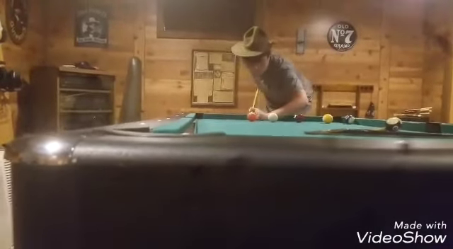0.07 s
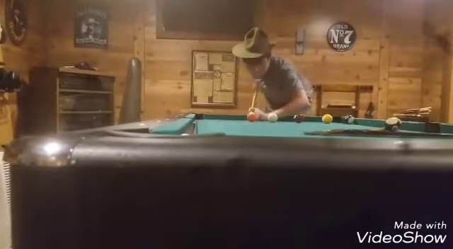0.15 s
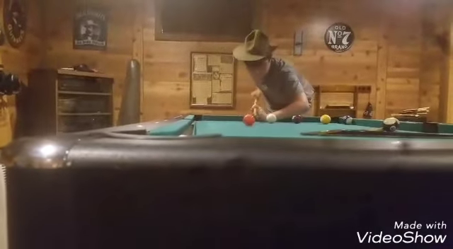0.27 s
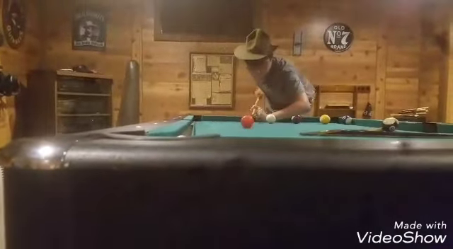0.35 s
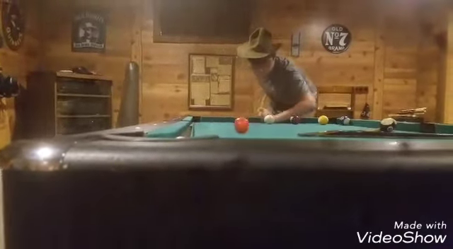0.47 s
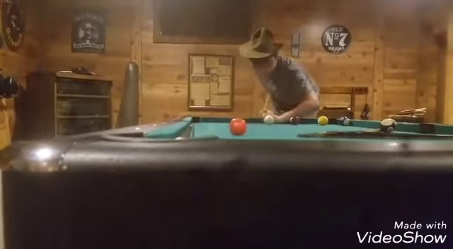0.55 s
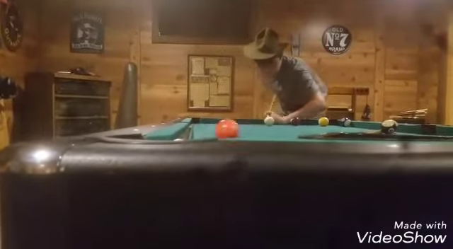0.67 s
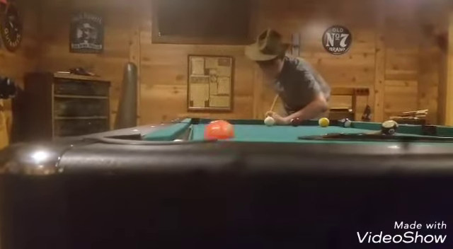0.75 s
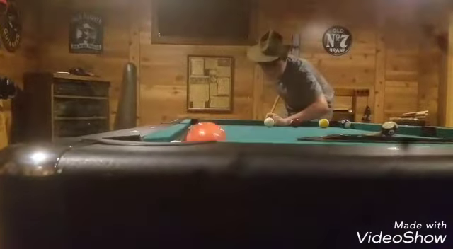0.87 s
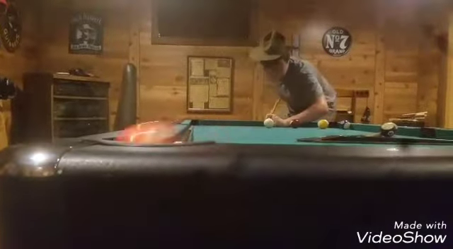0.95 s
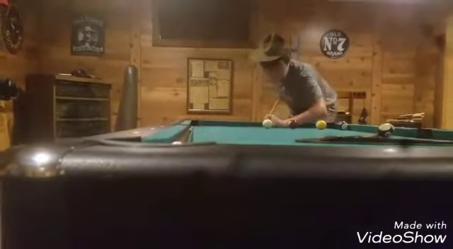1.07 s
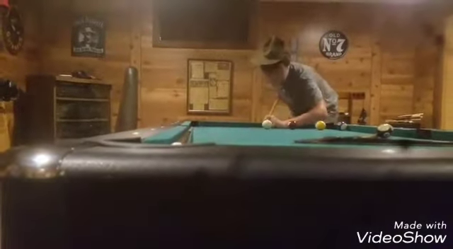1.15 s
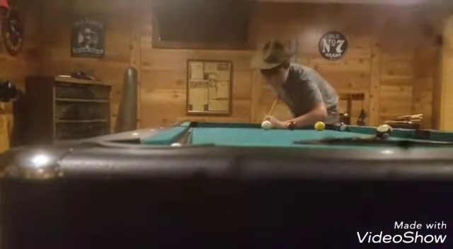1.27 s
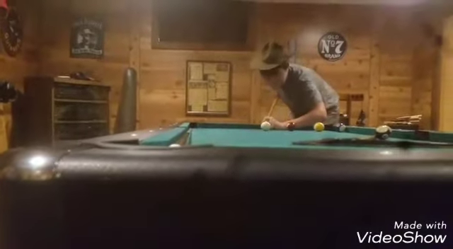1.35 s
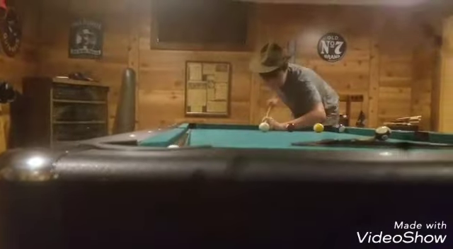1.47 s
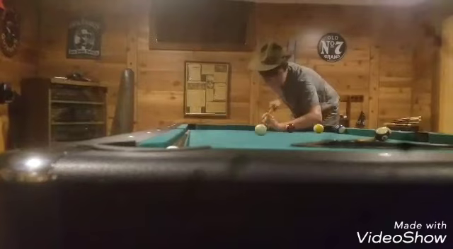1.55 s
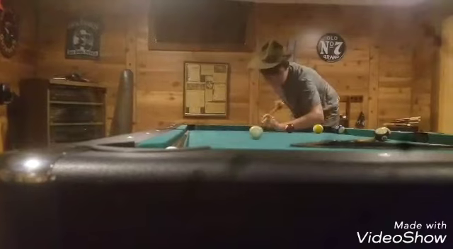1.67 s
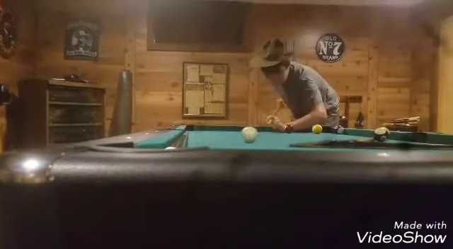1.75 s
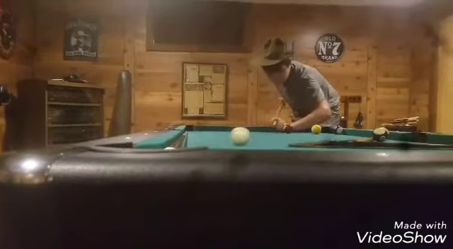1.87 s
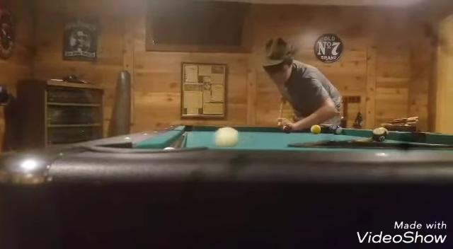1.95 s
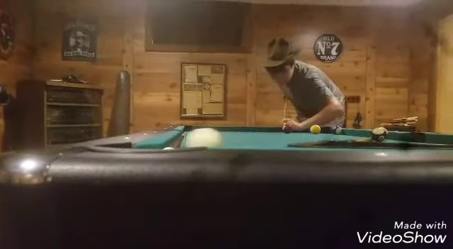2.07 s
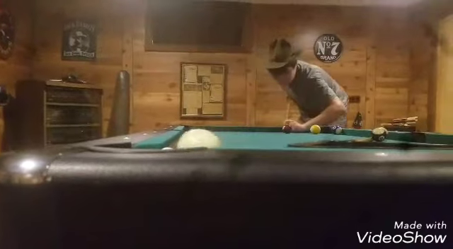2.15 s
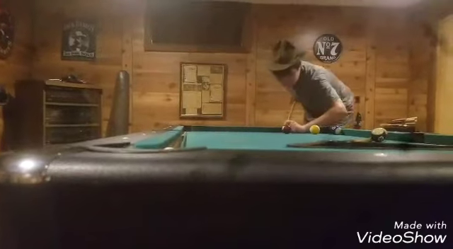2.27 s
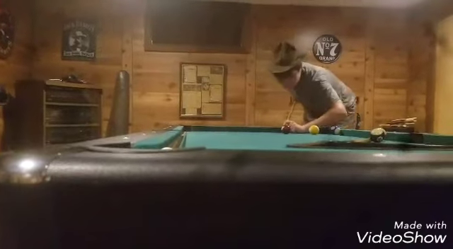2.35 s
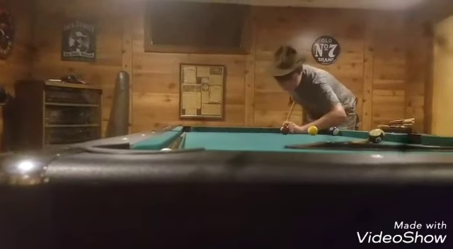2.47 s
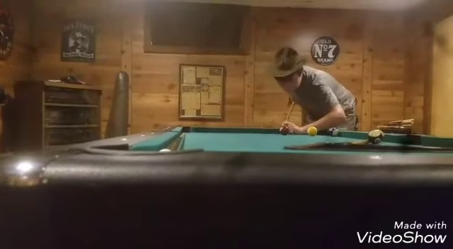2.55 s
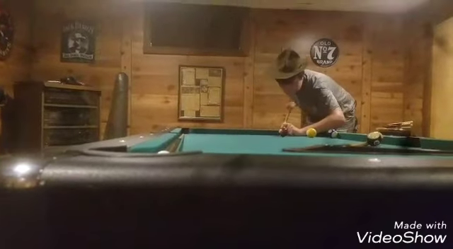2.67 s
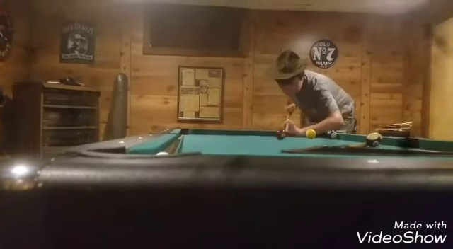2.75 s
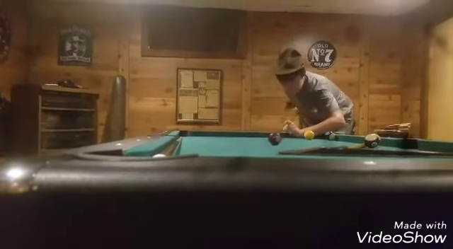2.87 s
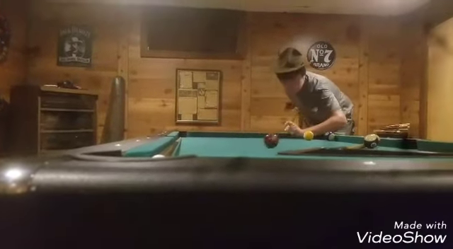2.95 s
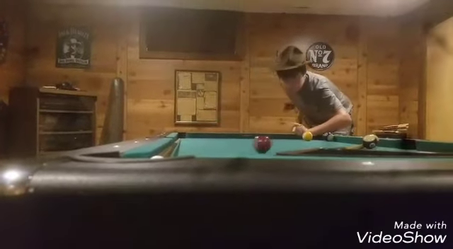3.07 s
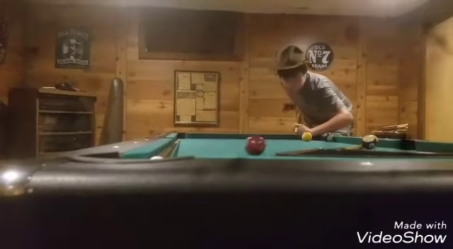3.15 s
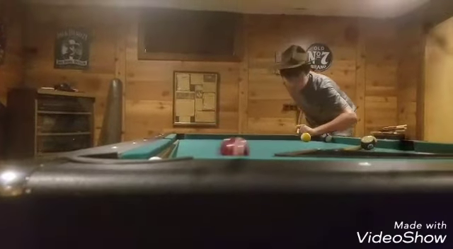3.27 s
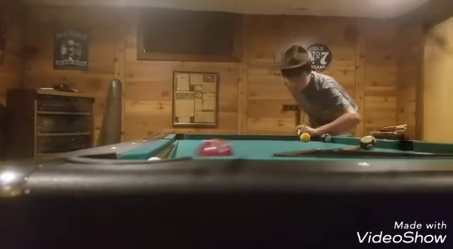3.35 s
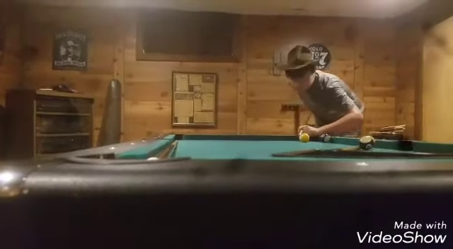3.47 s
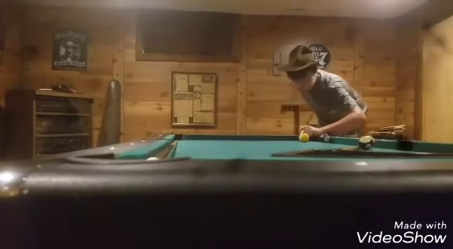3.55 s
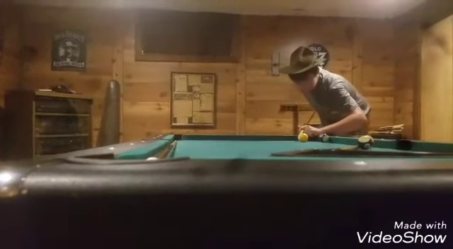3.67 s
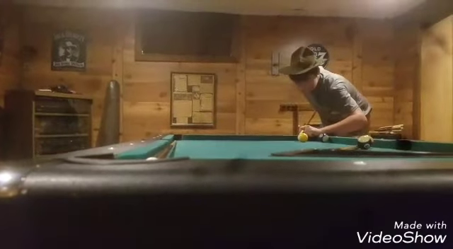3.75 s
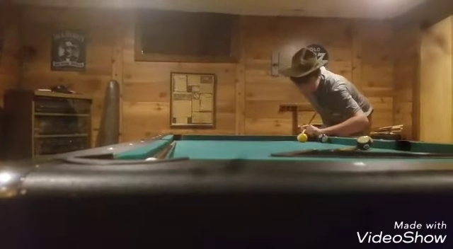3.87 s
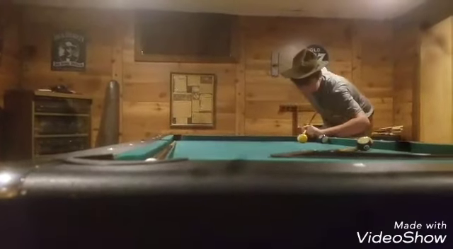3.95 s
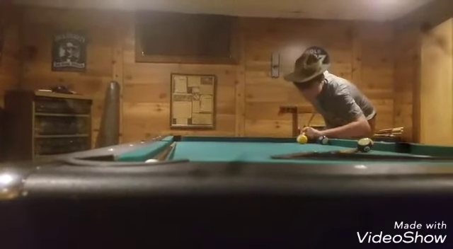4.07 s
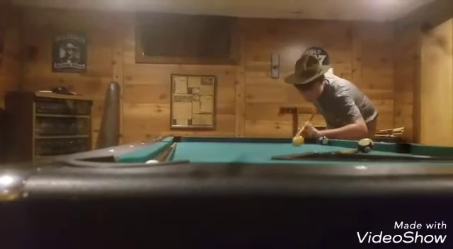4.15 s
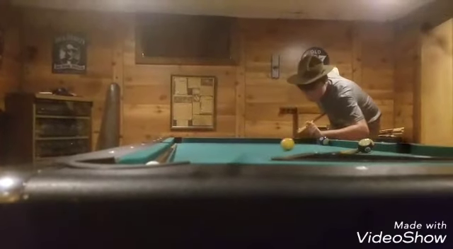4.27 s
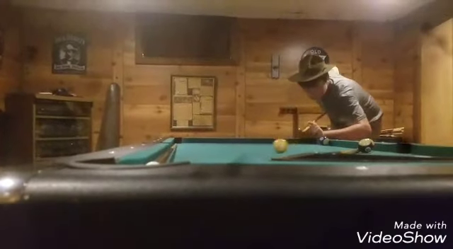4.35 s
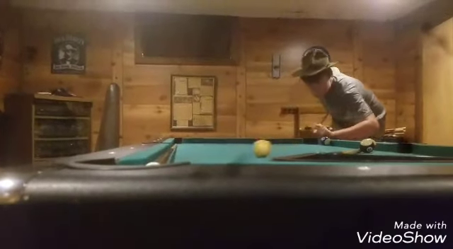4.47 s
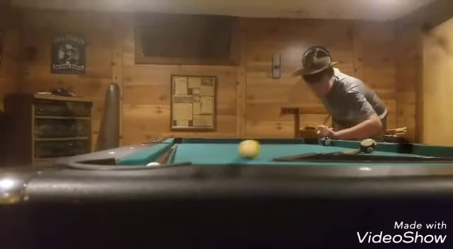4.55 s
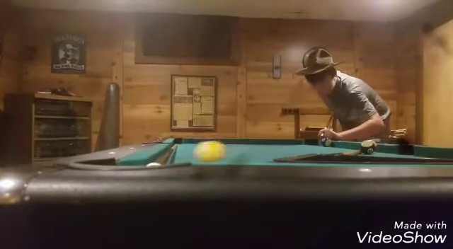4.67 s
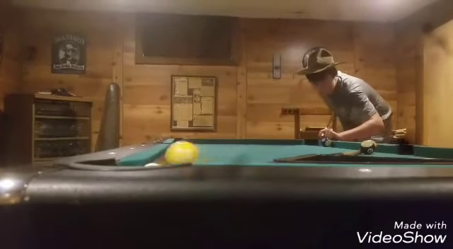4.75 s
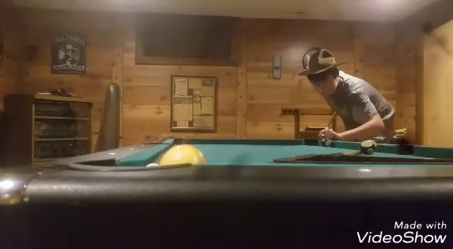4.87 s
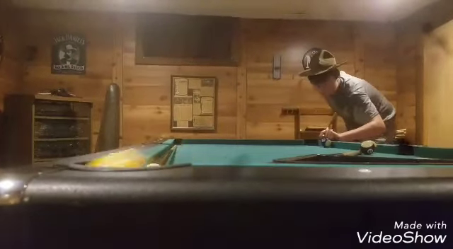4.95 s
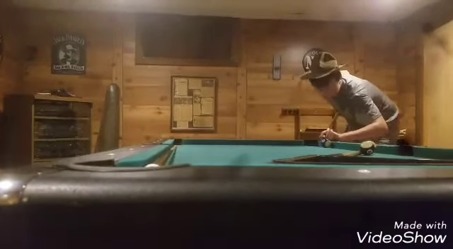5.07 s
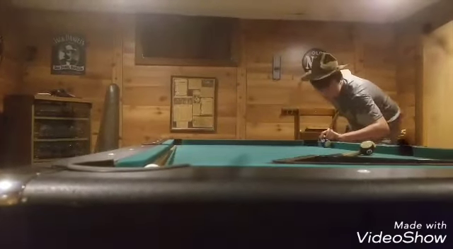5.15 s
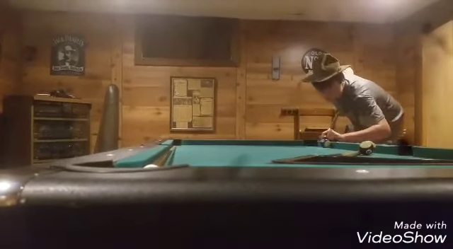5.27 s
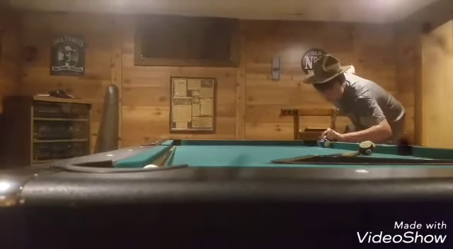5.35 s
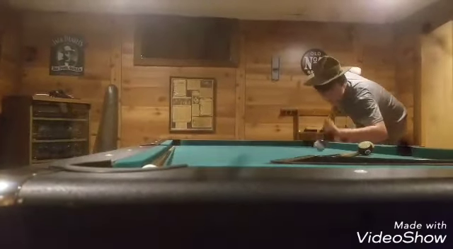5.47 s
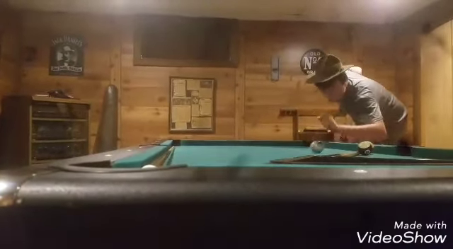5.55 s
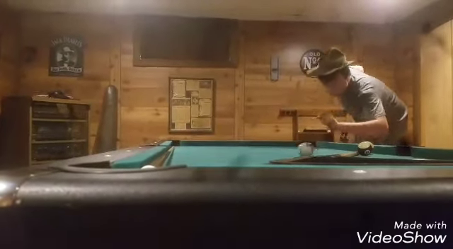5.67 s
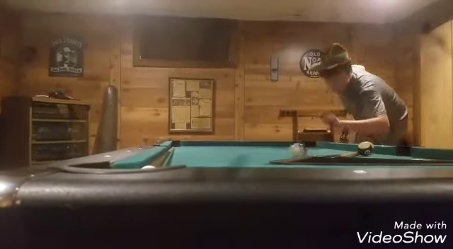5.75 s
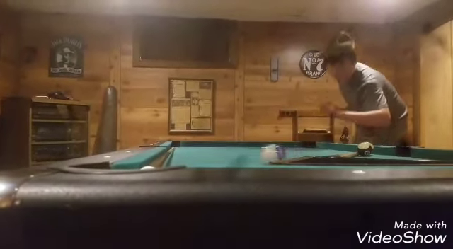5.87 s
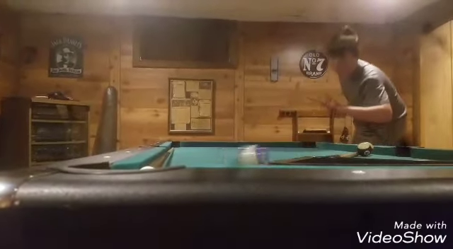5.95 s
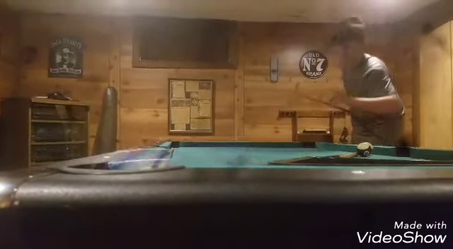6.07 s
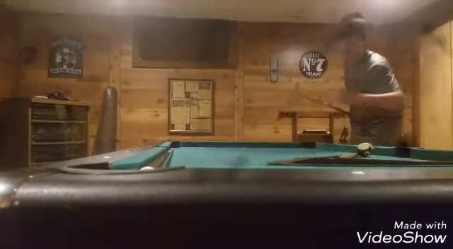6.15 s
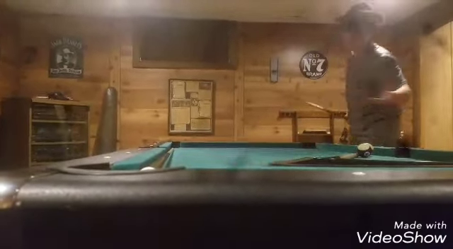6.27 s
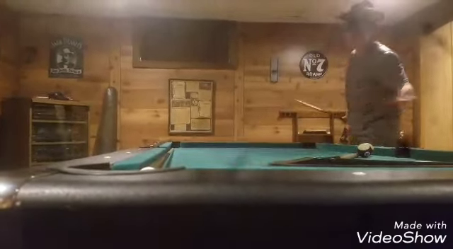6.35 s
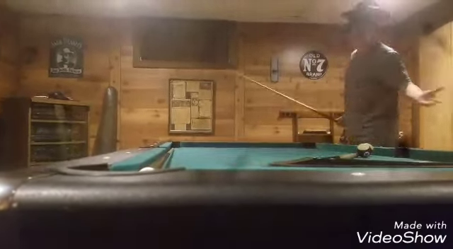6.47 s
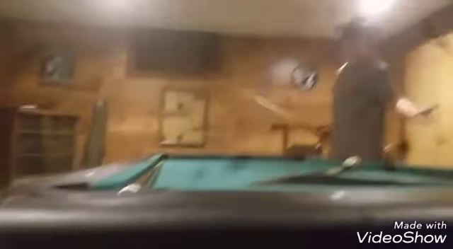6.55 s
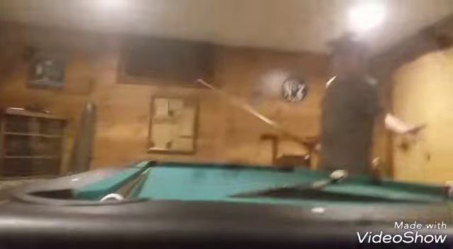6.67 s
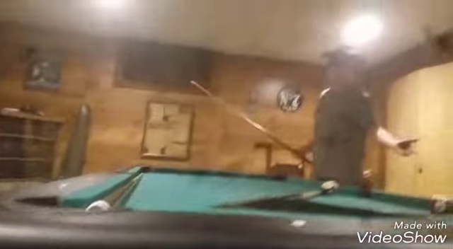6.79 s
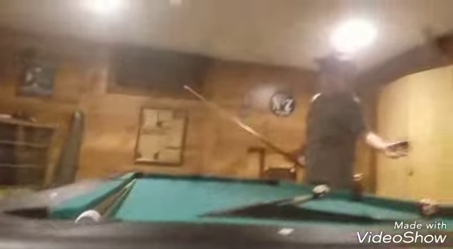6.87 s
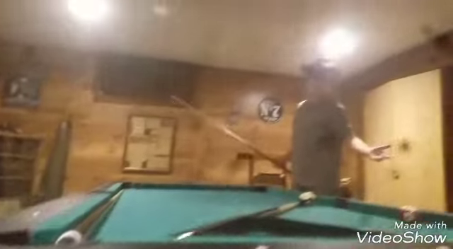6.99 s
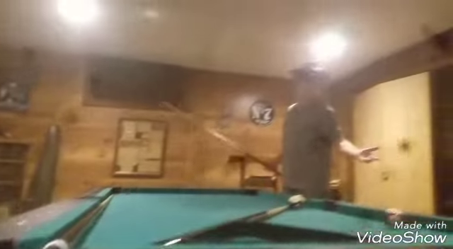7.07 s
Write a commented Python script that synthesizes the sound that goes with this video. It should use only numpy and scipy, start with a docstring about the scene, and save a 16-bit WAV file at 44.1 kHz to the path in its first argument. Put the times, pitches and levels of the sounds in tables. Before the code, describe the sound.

Five pool shots follow in quick succession, heard close beside a corner pocket. The cue knocks are woody and distant, coloured by short room echoes; balls roll quietly with small thumps, then hit the pocket hard and dry, ticking and clacking against balls already there. The last two shots start with heavier low thumps. Chatter dies quickly into quiet room air with a faint electric hum.

```python
"""Pool balls: five quick shots in a small wood-panelled room, heard from beside a corner pocket.
The cue knocks a ball at the far end, it rumbles over the slate, knocks into the pocket, ticks and clacks.
Each blow is a shaped pulse that rings the table or pocket modes, heard straight and through room echoes.
Rolling and jostling are dense random contacts under gain swells; still air and a faint hum lie beneath."""
import sys
import numpy as np
from scipy import signal
from scipy.fft import rfft, irfft, next_fast_len
from scipy.io import wavfile

SR = 44100
rng = np.random.default_rng(int(sys.argv[2]) if len(sys.argv) > 2 else 0)


def file_out(sig):
    """Save sig as 16-bit WAV at sys.argv[1]."""
    # one column per channel
    cols = np.atleast_2d(sig).T
    # limit, then scale
    lim = np.clip(cols, -1, 1)
    pcm = np.round(lim * 32767).astype(np.int16)
    wavfile.write(sys.argv[1], SR, pcm)


N = 313985
TIME_S = np.arange(N) / SR
TOP_HZ = 15500
ECHO_SAMPLES = 20480

# Resonances of the table and of the pocket. Each row: centre in Hz, width in Hz, level re the blow in dB.
TABLE_MODES = [(85.6, 17.3, 10.5), (181, 8.1, 6.5), (228, 31, -2), (289.5, 13, -1.5), (447, 4.4, -8),
               (610.5, 13.5, 1.5), (764, 147, -3), (785.4, 2.9, 1), (1130, 64, 4.5), (2028, 44, 3)]
POCKET_MODES = [(506, 16, -4.5), (737, 13.5, 0), (991, 25, 3), (1218, 134, -3.5), (1586, 9.1, 0.5),
                (2046, 12, -4.5), (2286, 20, -1), (2760, 32, 1), (2900, 29, -4), (3070, 24, 0),
                (3800, 22, -8), (4020, 22, -1), (4250, 25, -8)]
# Clusters of early reflections. Each row: delay in s, decay length in s, level re the wash in dB.
CEILING_ECHOES = [(.0005, 0.0036, 2.5), (0.01, 0.0023, -0.5), (0.026, 0.025, -12)]
MOUTH_ECHOES = [(.0055, 0.00073, 1.4)]
WALL_ECHOES = [(.0003, 0.0018, 12), (.0055, 0.0016, 0), (0.034, .007, -7)]


def cue_strikes():
    """Cue hits ball at the far end: rings the table, arrives mostly by the room."""
    # Each row: start in s, level in dB, treble in dB, bass in dB.
    cue_rows = [(.285, -11.5, -1.5, -6), (1.553, -12.5, 0.5, -3.5), (2.784, -12, -2.5, -8.5),
                (4.198, -12, -0.5, -17.5), (5.487, -11.5, -4, -23.5)]
    # Each row: frequency in Hz, relative level in dB.
    cue_tone = [(45, -24), (95, -9.5), (185, 1.5), (340, 4), (650, -7.5), (1060, -15), (1830, -23.5),
                (3100, -29), (5100, -32.5), (8000, -41), (13000, -45.5)]
    return blows(cue_rows, cue_tone, TABLE_MODES, CEILING_ECHOES, direct_db=-13.5, decay_ratio=0.93,
                 hold_s=0.033, build_s=0.00069, shade_s=0.012, rail_hz=1910)


def pocket_knocks():
    """Ball knocks dully on the near pocket: strong direct sound, left port first."""
    # Each row: start in s, level in dB, treble in dB.
    knock_rows = [(1.0245, -14.5, 9.5), (2.2842, -14.5, 10), (3.585, -20.5, 11), (4.938, -22.5, -9),
                  (5.0142, -15, 11)]
    # Each row: frequency in Hz, relative level in dB.
    knock_tone = [(45, -42), (110, -18), (185, -10), (340, 1.5), (720, 4), (1060, -14.5), (1830, -25.5),
                  (3100, -32.5), (5100, -44.5), (8000, -51.5), (13000, -53)]
    return blows(knock_rows, knock_tone, POCKET_MODES, MOUTH_ECHOES, direct_db=-1.5, decay_ratio=1.11,
                 hold_s=0.0036, build_s=0.0014, lead_s=0.00005, rail_hz=5000,
                 weight_db=5.5, bass_per_db=1.1)


def drop_ticks():
    """Ball ticks hard and bright as it drops, with close rim reflections, left port first."""
    # Each row: start in s, level in dB, treble in dB.
    tick_rows = [(1.087, -27, 13.5), (1.092, -24, 3.5), (1.1698, -36.5, 2), (2.3485, -21.5, 6.5),
                 (2.4845, -47, -1), (3.5805, -17.5, 6.5), (3.635, -28, 2), (5.0828, -21.5, 8),
                 (5.1485, -27.5, 8.5), (6.2455, -18.5, 12), (6.2565, -25.5, -1)]
    # Each row: frequency in Hz, relative level in dB.
    tick_tone = [(60, -8), (185, 12.5), (340, 8), (650, 14.5), (1060, 4), (1830, 0.5), (3100, -8.5),
                 (5100, -11.5), (8000, -21.5), (13000, -21.5)]
    # Each row: delay in s, decay length in s, level re the wash in dB.
    rim_echoes = [(.0001, 0.0012, 5.6), (.0035, 0.00095, 7.4), (.0075, .003, 3)]
    return blows(tick_rows, tick_tone, POCKET_MODES, rim_echoes, direct_db=-8, decay_ratio=1.0,
                 hold_s=0.0015, build_s=0.00013, lead_s=0.000195, weight_db=-1)


def landing_thuds():
    """Ball lands heavily in the pocket and rings the table; mostly direct sound."""
    # Each row: start in s, level in dB, treble in dB.
    thud_rows = [(1.219, -25.5, 12), (2.483, -19.5, 10)]
    # Each row: frequency in Hz, relative level in dB.
    thud_tone = [(45, -68), (95, -12.5), (185, -3), (340, -2), (600, -12.5), (1200, -18.5), (3000, -32),
                 (13000, -63.5)]
    return blows(thud_rows, thud_tone, TABLE_MODES, MOUTH_ECHOES, direct_db=4.5, decay_ratio=0.67,
                 hold_s=0.002, build_s=0.0013, rail_hz=2000)


def pocket_clacks():
    """Ball against ball in the pocket: harder contacts are shorter and brighter, left port first."""
    # Each row: start in s, level in dB, treble in dB.
    clack_rows = [(1.194, -22.5, 7.5), (1.214, -28, 0), (1.3255, -30, 5), (1.3945, -27.5, 0),
                  (2.4654, -24, 6), (2.494, -27, 15), (2.597, -35, 1), (3.6605, -20, -7.5),
                  (3.698, -24, -3.5), (3.7734, -28.5, -4.5), (3.786, -34.5, 20), (5.142, -24, 3),
                  (5.177, -23.5, -1), (5.2645, -32.5, 4), (6.2865, -19, 8), (6.296, -25, 9),
                  (6.304, -21.5, -2.5), (6.319, -23, 5), (6.4445, -26.5, -7), (6.4718, -40, -2)]
    # Each row: frequency in Hz, relative level in dB.
    clack_tone = [(60, -24), (340, -12.5), (650, 1), (1060, -1), (1900, 8), (3100, 2.5), (4400, -13),
                  (5300, -27), (7000, -40.5), (13000, -47)]
    return blows(clack_rows, clack_tone, POCKET_MODES, WALL_ECHOES, direct_db=-7.5, decay_ratio=0.86,
                 hold_s=0.0022, build_s=0.0015, lead_s=0.0001, rail_hz=6000, stiffening=0.082)


def cushion_thumps():
    """Ball thumps dully on bed and cushions: the softer the thump, the more of it is bass."""
    # Each row: start in s, level in dB, treble in dB.
    thump_rows = [(.618, -32.5, -10), (1.765, -37, 0), (1.922, -40, 0), (2.045, -38.5, 3),
                  (3.02, -39.5, -16), (3.085, -35, -2), (3.152, -34, -3), (3.512, -30, 20),
                  (4.283, -13.5, 2), (4.463, -39, 23), (4.604, -33.5, 21), (4.715, -38, -24),
                  (5.586, -11, 11), (5.635, -24.5, 5), (5.840, -31, -6), (6.192, -27.5, 10)]
    # Each row: frequency in Hz, relative level in dB.
    thump_tone = [(45, -36.5), (95, -14), (185, 1), (340, 5.5), (600, -4), (1060, -19.5), (1830, -32),
                  (5100, -52.5), (13000, -71)]
    return blows(thump_rows, thump_tone, TABLE_MODES, CEILING_ECHOES, direct_db=-7.5, decay_ratio=0.98,
                 hold_s=0.0077, build_s=0.0023, shade_s=0.0058, rail_hz=1500,
                 weight_db=6, bass_per_db=-0.54)


def far_clacks():
    """Clacks that arrive mostly by way of the walls."""
    # Each row: start in s, level in dB.
    far_rows = [(.949, -32.5), (2.219, -27.5), (4.8664, -18.5)]
    # Each row: frequency in Hz, relative level in dB.
    far_tone = [(60, -4.5), (340, 1.5), (650, 7.5), (1100, 5.5), (2100, 8), (3100, -6), (5100, -10),
                (8000, -26.5), (13000, -36)]
    return blows(far_rows, far_tone, POCKET_MODES, CEILING_ECHOES, direct_db=-14, decay_ratio=0.98,
                 hold_s=0.016, build_s=0.0045, shade_s=0.001, rail_hz=3000)


def rolling():
    """Ball bumps over the cloth weave and rumbles the table, easing as it stops skidding."""
    # Each row: start in s, length in s, level at the start in dB.
    roll_rows = [(.5, 0.37, -41.5), (1.72, 0.39, -40), (2.99, 0.45, -39.5), (4.48, 0.33, -39.5),
                 (5.79, 0.36, -39)]
    # Each row: frequency in Hz, relative level in dB.
    roll_tone = [(50, -20.5), (110, 0), (190, -3), (330, 7.5), (550, -0.5), (900, -17), (2000, -73),
                 (8000, -52)]
    gain = swell(roll_rows, attack_s=0.043, release_s=0.084, fade_db_per_s=20.5)
    return gain * texture(bumps(rate_hz=920, scatter_db=-1), roll_tone, TABLE_MODES)


def jostling():
    """Balls in the pocket chatter until they settle: each rebound loses a little."""
    # Each row: start in s, length in s, level at the start in dB.
    jostle_rows = [(0, 0.016, -34.5), (1.24, 0.26, -42.5), (2.55, 0.077, -34.5), (3.71, 0.2, -38.5),
                   (5.19, 0.13, -32), (6.32, 0.079, -32), (6.47, 0.084, -32.5)]
    # Gentle contacts last longer and sound duller. Each row: frequency in Hz, relative level in dB.
    jostle_tone = [(200, -3.5), (650, 3), (1200, 7.5), (2200, 10), (3000, -0.5), (4200, -24), (5500, -21),
                   (12000, -83)]
    gain = swell(jostle_rows, attack_s=0.063, release_s=0.12, fade_db_per_s=20)
    return gain * texture(bumps(rate_hz=200, scatter_db=1.0), jostle_tone, POCKET_MODES)


def room_tone():
    """Still air as coloured noise, plus a faint electric hum of steady sines."""
    # Each row: frequency in Hz, relative level in dB.
    air_tone = [(22, -51), (38, -7), (60, 1.5), (85, -8.5), (180, -11.5), (330, -11.5), (650, -13.5),
                (1200, -18.5), (3000, -26.5), (4500, -34.5), (8000, -46), (12500, -42), (16000, -44)]
    # Each row: frequency in Hz, rms level in dB.
    hum_rows = [(59.5, -73.5), (161.5, -57), (226, -56.5)]
    air = undb(-48.5) * texture(rng.standard_normal((2, N)), air_tone)
    hum = 0
    for hz, db in hum_rows:
        cycles = hz * TIME_S + rng.random()
        hum = hum + undb(db) * np.sqrt(2) * np.sin(2 * np.pi * cycles)
    return air + hum


def blows(rows, tone, modes, early, direct_db, decay_ratio, hold_s, build_s, lead_s=0, shade_s=0,
          rail_hz=20000, stiffening=0, weight_db=0, bass_per_db=0):
    """Blows ring a body, heard straight and by the walls; level is the rms of the first 35 ms."""
    kept, attack = 16384, int(0.035 * SR)  # samples
    hz, out = bins(ECHO_SAMPLES), np.zeros((2, N + ECHO_SAMPLES))
    delay_s = np.array([[0], [lead_s]])  # left port leads
    straight = undb(direct_db) * np.exp(-2j * np.pi * hz * delay_s)
    straight = straight / (1 + 1j * hz / rail_hz)  # bending over the rail dulls the direct sound
    bass = along([(190, 1), (520, 0)], hz)
    treble = along([(900, 0), (4500, 1)], hz)
    body = ringing(modes, hz)
    usual_db = np.mean([row[1] for row in rows])
    for row in rows:
        start_s, db, treble_db, bass_db = np.pad(row, (0, 4 - len(row)))  # missing columns are 0 dB
        harder_db = db - usual_db
        quickness = undb(stiffening * harder_db)  # a harder contact is shorter and reaches higher
        low_db = weight_db + bass_db + bass_per_db * harder_db
        contact = causal(along(tone, hz / quickness) + low_db * bass + treble_db * treble)
        paths = straight + echoes(decay_ratio, hold_s, build_s, early, shade_s)
        hit = irfft(contact * body * paths)[:, :kept]
        start = int(start_s * SR)
        out[:, start:start + kept] += hit * undb(db) / np.sqrt(np.mean(hit[:, :attack] ** 2))
    return out[:, :N]


def bumps(rate_hz, scatter_db):
    """Random small contacts of uneven size, each smeared by the room."""
    chance, size = rng.random(N), rng.standard_normal(N)
    taps = (chance < rate_hz / SR) * undb(scatter_db * np.clip(size, -2, 2))
    wash = echoes(decay_ratio=0.51, hold_s=0.0016, build_s=0.0044, early=WALL_ECHOES)
    room = irfft(undb(-5.5) + wash)
    return signal.fftconvolve(taps[None], room, axes=1)[:, :N]


def swell(rows, attack_s, release_s, fade_db_per_s):
    """Gain of movements: each sets in, fades steadily as it loses energy, and eases to a stop."""
    gain = 0
    for start_s, length_s, db in rows:
        age_s = TIME_S - start_s
        gate = np.interp(age_s, [-attack_s, 0, length_s, length_s + release_s], [0, 1, 1, 0]) ** 2
        gain = gain + gate * undb(db - fade_db_per_s * np.maximum(age_s, 0))
    return gain


def texture(pair, tone, modes=()):
    """A lasting excitation, coloured and rung through a body; rms 1."""
    size = next_fast_len(N)
    hz = bins(size)
    excitation = spread(np.pad(pair, ((0, 0), (0, size - N))))
    spectrum = excitation * undb(along(tone, hz)) * ringing(modes, hz)
    return unit(irfft(spectrum, size)[:, :N])


def echoes(decay_ratio, hold_s, build_s, early, shade_s=0, grain_db=5, merge_s=0.11):
    """Room response, about unit energy per ear: reflections thicken into a wash dying band by band."""
    # Each row: frequency in Hz, t60 in s before decay_ratio.
    room_t60 = [(100, 0.39), (300, 0.33), (700, 0.22), (1500, 0.26), (4000, 0.25), (13000, 0.1)]
    t, hz = np.arange(ECHO_SAMPLES) / SR, bins(ECHO_SAMPLES)
    noise, sizes = rng.standard_normal((2, 2, ECHO_SAMPLES))
    uneven = np.log(undb(grain_db)) * np.exp(-t / merge_s)
    grain = np.exp(uneven * np.minimum(sizes, 2) - uneven ** 2)
    clusters = 1
    for delay_s, length_s, db in early:
        clusters = clusters + undb(db) * (t >= delay_s) * np.exp(-abs(t - delay_s) / length_s)
    wash = spread(noise * grain * clusters)
    age_s = np.hypot(t, hold_s) - hold_s  # the level holds briefly, then dies away
    octaves, out = np.log2(np.clip(hz, 62.5, 16000) / 62.5), 0
    for k in range(9):
        centre_hz = 62.5 * 2 ** k
        share = np.maximum(1 - abs(octaves - k), 0)
        # behind the rail, treble arrives only by detours
        rise = 1 - np.exp(-t / (build_s + shade_s * centre_hz / TOP_HZ))
        t60_s = decay_ratio * along(room_t60, centre_hz)
        band = irfft(wash * share) * rise * np.exp(-np.log(1000) * age_s / t60_s)
        out = out + band * np.sqrt(2 * np.mean(share ** 2) / np.sum(band ** 2))
    return rfft(out)


def spread(pair):
    """Two signals become mid and side of a left and right spectrum, alike in the bass."""
    # Each row: frequency in Hz, correlation between the ears.
    ear_correlation = [(100, 0.97), (200, 0.92), (350, 0.91), (700, 0.52), (1500, 0.043), (3000, 0.04)]
    mid, side = rfft(pair)
    alike = np.clip(along(ear_correlation, bins(pair.shape[1])), 0, 1)
    mid, side = mid * np.sqrt(1 + alike), side * np.sqrt(1 - alike)
    return np.array([mid + side, mid - side])


def ringing(modes, hz):
    """Response of a body: the blow itself plus its decaying modes."""
    return 1 + sum(undb(db) / (1 + 2j * (hz - f) / width) for f, width, db in modes)


def causal(db):
    """Minimum-phase spectrum: the fastest causal response that has this gain curve."""
    cepstrum = irfft(np.log(undb(db)))
    half = len(cepstrum) // 2
    cepstrum[1:half] *= 2
    cepstrum[half + 1:] = 0
    return np.exp(rfft(cepstrum))


def undb(db):
    """Decibels to gain."""
    return 10 ** (np.asarray(db) / 20)


def along(points, hz):
    """Read (Hz, value) points on a log-frequency axis."""
    f, value = np.transpose(points)
    return np.interp(np.log(np.maximum(hz, 1)), np.log(f), value)


def bins(size):
    """Frequencies in Hz of a spectrum of that many samples."""
    return np.fft.rfftfreq(size, 1 / SR)


def unit(x):
    """Scale to rms 1."""
    return x / np.sqrt(np.mean(x ** 2))


def scene():
    """Blows at the far end and in the pocket, rolling, jostling and room tone."""
    far_end = cue_strikes() + cushion_thumps() + far_clacks()
    pocket = pocket_knocks() + drop_ticks() + landing_thuds() + pocket_clacks()
    return far_end + pocket + rolling() + jostling() + room_tone()


def record(dry):
    """Each microphone port has its own colour; the peaks are capped and the top is cut."""
    # Each row: frequency in Hz, left minus right in dB.
    port_tilt = [(200, -1.9), (600, -3.5), (1800, -4), (3000, -3), (5200, -7.5), (7500, -4.5), (9500, 8.5),
                 (14000, 2)]
    half_tilt_db = along(port_tilt, bins(size=512)) / 2
    ports = []
    for x, sign in zip(dry, (1, -1)):
        colour = irfft(causal(sign * half_tilt_db))
        ports.append(signal.fftconvolve(x, colour)[:N])
    capped = np.clip(np.array(ports), -0.9, 0.9)
    low_pass = signal.ellip(8, 0.2, 70, TOP_HZ, fs=SR, output="sos")
    return signal.sosfilt(low_pass, capped)


dry = scene()
out = record(dry)
file_out(out)
```